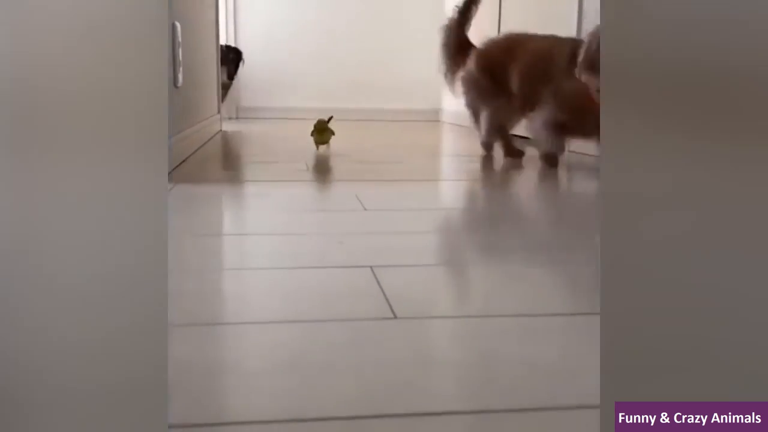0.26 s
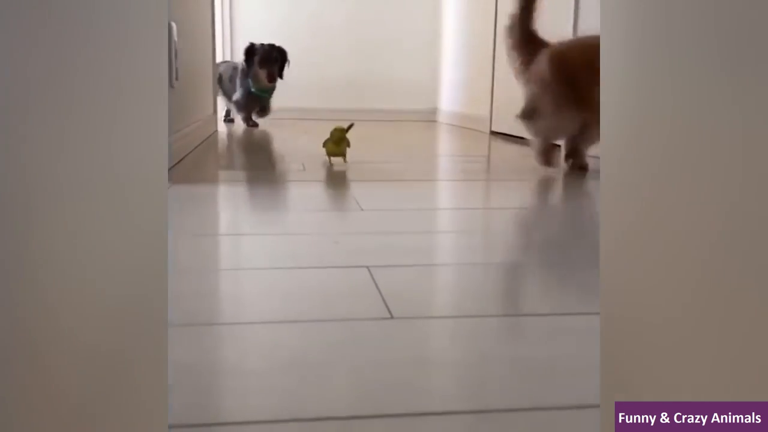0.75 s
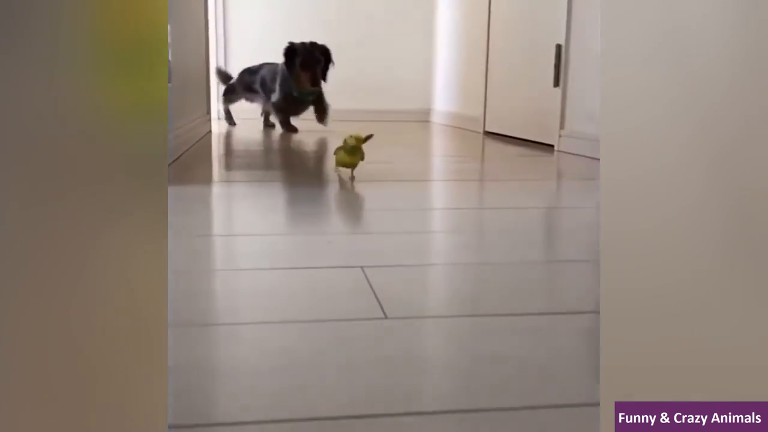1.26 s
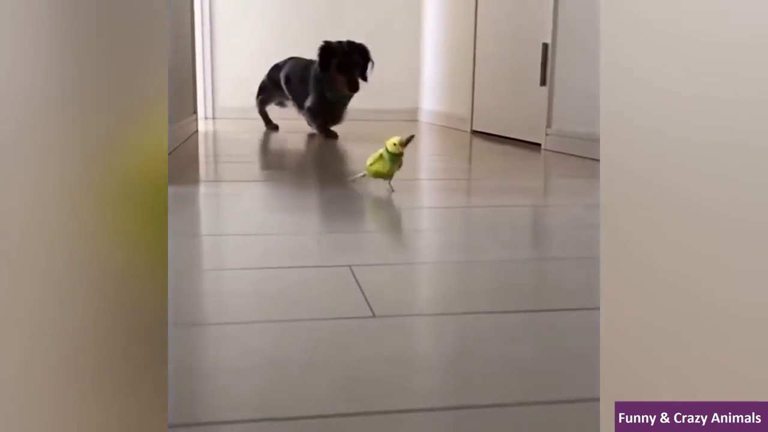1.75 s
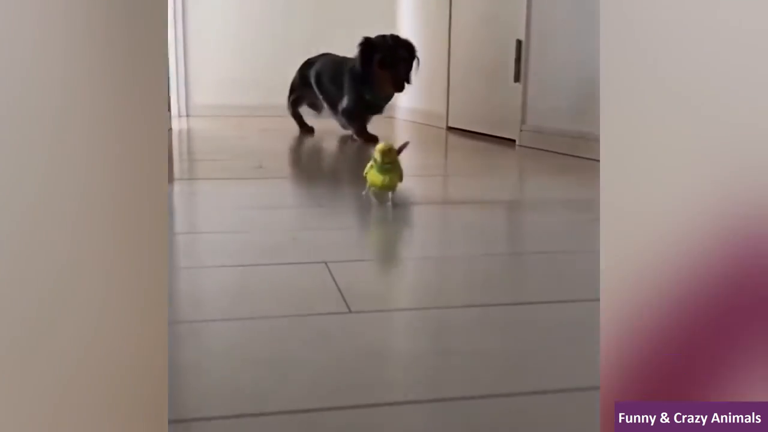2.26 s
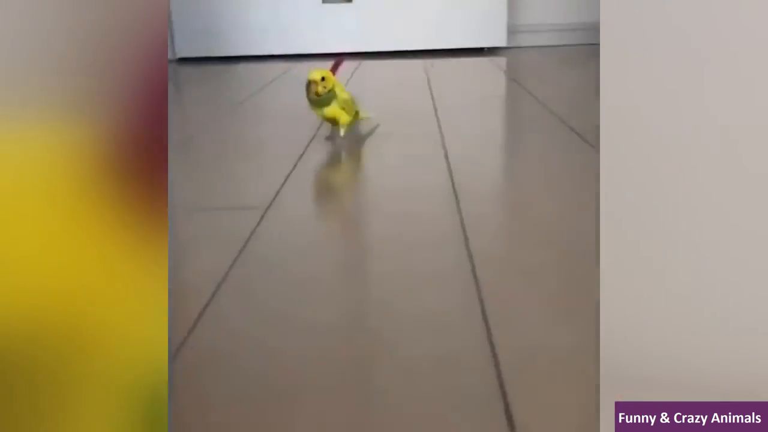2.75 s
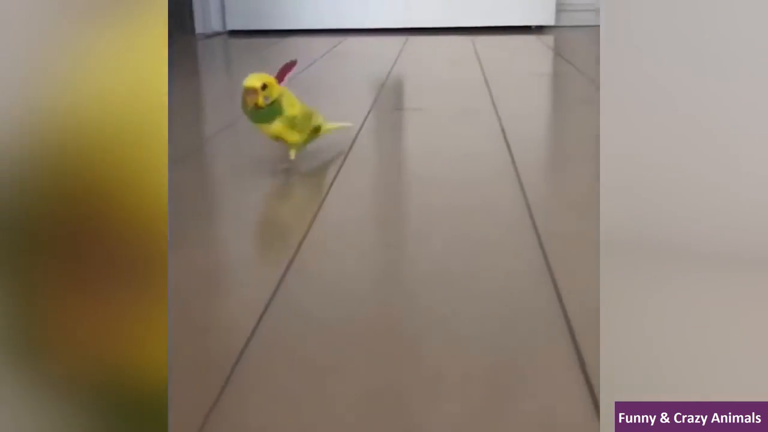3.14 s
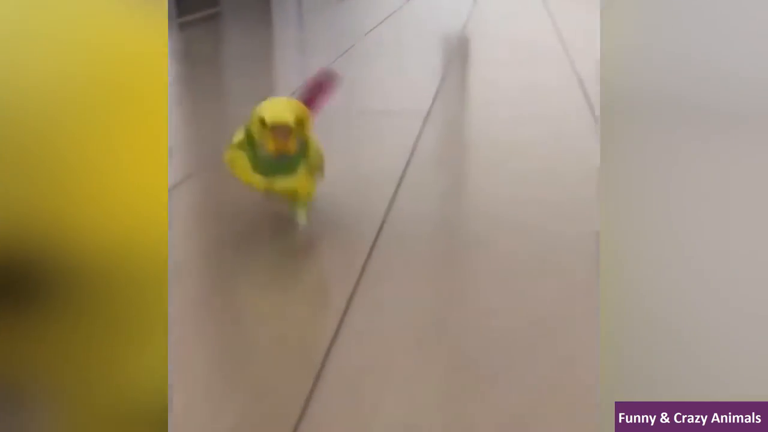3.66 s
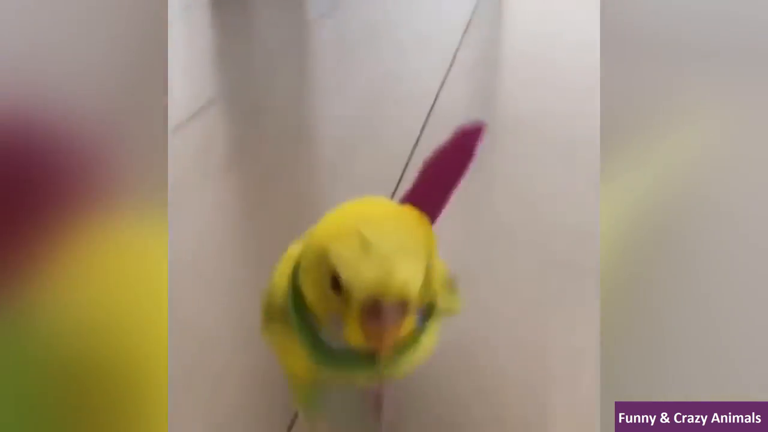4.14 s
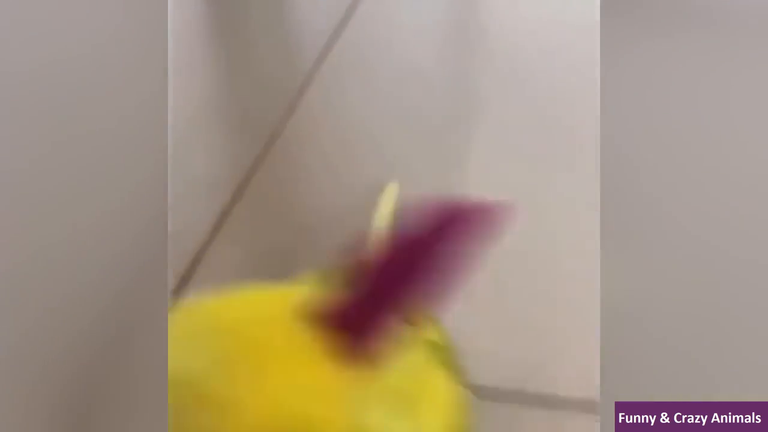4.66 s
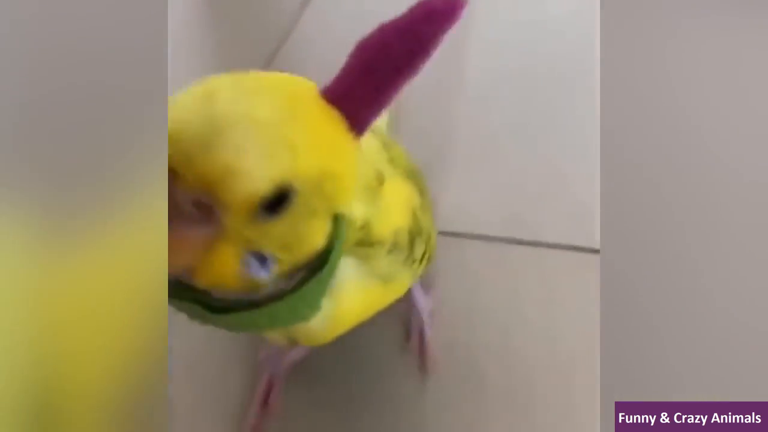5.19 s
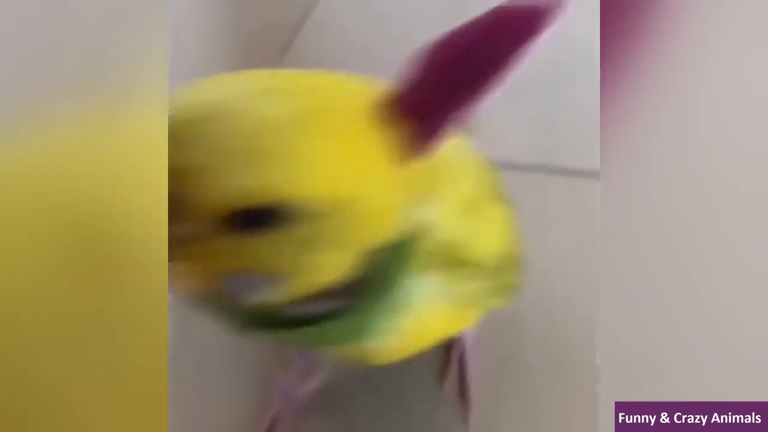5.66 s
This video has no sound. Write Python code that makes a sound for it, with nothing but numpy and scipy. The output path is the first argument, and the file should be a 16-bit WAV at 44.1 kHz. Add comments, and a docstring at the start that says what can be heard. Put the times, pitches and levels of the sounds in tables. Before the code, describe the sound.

Bright, irregular claw clicks and little scratches ring in a hallway as a small dog trots on hard tiles over a low room rumble. After a momentary drop to silence, the softer, rapid steps of a small parrot take over, coming close to the microphone. A few taps sound hollow, and the steps thin out near the end above a faint hum.

```python
"""A small dog trots over a tiled hallway floor: its claws click and scrape in clusters, and the walls ring.
Each claw excites its own resonance by friction and knocks the floor. After a brief dip to silence
a small parrot patters up close: each toe ticks and sends a short bending wave through the floor,
and a few taps set a hollow tile ringing. Under both lies low room noise, later with a faint hum."""
import sys
import numpy as np
from scipy import signal
from scipy.fft import rfft, irfft, next_fast_len
from scipy.io import wavfile
from scipy.ndimage import uniform_filter1d

SR = 44100
rng = np.random.default_rng(int(sys.argv[2]) if len(sys.argv) > 2 else 0)


def dump_mix(stems):
    """Bounce the given channels to the path in sys.argv[1] as a 16-bit WAV at rate SR."""
    frames = np.atleast_2d(stems).T  # one column per channel
    limited = np.clip(frames, -1, 1)  # hard clip at full scale
    pcm = np.round(limited * 32767).astype(np.int16)
    wavfile.write(sys.argv[1], SR, pcm)


N = 261080
CHANGE_S = 3.0  # the parrot takes over from the dog

# Spectra of rumble, air, nail tick, floor thud and claw (frequency [Hz], relative level [dB])
RUMBLE_SPECTRUM = [(15, -46), (25, -17), (48, -1.5), (68, -1), (105, 4), (160, -21), (203, 1), (235, -17.5),
                   (290, 0), (400, -8), (700, -14), (1500, -30.5)]
AIR_SPECTRUM = [(15, -50), (25, -29), (50, -13), (85, -12), (130, -12), (230, -13), (300, -17), (650, -28),
                (1000, -29), (3000, -40), (4600, -42), (14000, -46)]
TICK_SPECTRUM = [(500, -16), (2000, -5), (3000, -3), (3600, 0), (4800, -4), (5900, 1), (7000, -4),
                 (12000, -2.5), (14000, -4)]
THUD_SPECTRUM = [(120, -43), (250, -5.5), (400, 5.5), (600, -1), (900, -6), (1300, -9.5), (1850, -7.5),
                 (2400, -21.5), (5000, -33)]
CLAW_SPECTRUM = [(200, -19), (600, -12), (1400, -6), (2000, -10.5), (2650, -8), (3250, -1.5), (4200, -8),
                 (5000, -6), (5650, 0), (7000, -6.5), (8200, -2.5), (10200, -10), (11100, -6.5),
                 (12500, -15.5)]
# Spectrum of the hum's wavering (frequency [Hz], relative level [dB])
SWAY_SPECTRUM = [(1, 0), (4, -5), (10, -25), (60, -90)]
# Shelves that tilt a spectrum (frequency [Hz], share of the boost [1])
TICK_SHELF, THUD_SHELF = [(5000, 0), (10000, .7)], [(500, .11), (1800, .89)]
CLAW_SHELF, KNOCK_SHELF = [(6500, 0), (10500, .8)], [(1500, 1), (2700, 0)]
# Reverberation around the dog and the parrot (frequency [Hz], time to fall 60 dB [s])
DOG_T60 = [(300, 0.8), (1000, 0.78), (3000, 0.34), (6000, 0.58), (12000, 0.23)]
PARROT_T60 = [(300, 0.15), (1500, 0.3), (6000, 1), (12000, 0.12)]
# Gains of the air, the parrot's echo and the whole scene with its dip (time [s], gain [dB])
AIR_GAIN = [(0, 10.5), (2.9, 6.5), (3.1, 3), (4.7, 5), (5.0, 2.7)]
PARROT_ECHO_GAIN = [(3.1, 3.5), (4.2, -4.5), (5.8, -7)]
SCENE_GAIN = [(2.92, -6.5), (2.975, -15.5), (2.995, -34), (3.008, -47), (3.02, -11), (3.06, -5.5)]
# Taps on a hollow tile (time [s], relative level [dB], pitch [Hz])
HOLLOW_TAPS = [(3.163, -42, 1410), (3.246, -48, 1450), (3.714, -48.5, 1690), (3.890, -51.5, 1790),
               (4.619, -43, 1200)]
# Parrot steps (time [s], relative tick level [dB], relative thud level [dB], thud brightness [dB])
PARROT_STEPS = [(3.046, -46.5, -41.5, -8), (3.162, -50.5, -41.5, -3), (3.245, -53, -39, -2.5),
                (3.36, -47.5, -40.5, -15), (3.4326, -49.5, -48.5, -6), (3.5263, -43, -60, -5),
                (3.5366, -42, -38.5, 2), (3.6043, -42, -40.5, 7), (3.7131, -43, -35, -4.5),
                (3.7896, -43.5, -40, -9), (3.8883, -46, -33, 3.5), (3.9777, -45, -38.5, 1.5),
                (4.065, -37, -31, 2.5), (4.145, -43, -31.5, -0.5), (4.2515, -36.5, -34, -3.5),
                (4.3364, -42, -39, -5), (4.391, -48, -68, -7), (4.456, -41.5, -34, -15),
                (4.5422, -39.5, -36.5, -10), (4.6185, -42, -43, 3), (4.661, -38, -38, -5),
                (4.762, -35.5, -42.5, -1), (4.9175, -43.5, -46.5, -2), (5.1426, -56.5, -53, -1),
                (5.2962, -55, -52.5, -14), (5.374, -58, -47, -8), (5.545, -50.5, -49, -9),
                (5.578, -39.5, -36.5, -0.5)]
# Pads tick dully, nails brightly (tick over thud [dB], tick treble [dB])
TICK_TREBLE = [(-13, -3), (-4, 5)]
# Paw landings (time [s], relative level [dB], ring pitch [Hz], treble [dB], floor knock [dB],
# second claw's delay [ms], its level over the first [dB], its ring pitch [Hz])
PAW_LANDINGS = [(0.001, -41.5, 2760, -2, 2, 8, -4, 5650), (0.052, -34, 7700, 0, -1.5, 7, -0.5, 8700),
                (0.133, -35.5, 3100, -8, -3, 5.6, -10, 5700),
                (0.146, -35.5, 5760, -11, 0.5, 13.4, -2.5, 3230),
                (0.2343, -33, 6040, 0.5, -3, 9, -0.5, 8000), (0.3487, -33, 3430, -1.5, 0.5, 14.5, 3, 5500),
                (0.418, -32.5, 7200, -5, 2, 7, 0.5, 2780), (0.5785, -34, 5740, 0, 3, 6, -8, 3400),
                (0.606, -36.5, 3700, 6, 0, 6, 0, 2950), (0.7662, -28.5, 5350, -5.5, -3, 7, 1.5, 3040),
                (0.9238, -42, 3000, -20, 0.5, 14, -8.5, 5140), (1.0242, -24.5, 5450, 0, 0, 6, 1, 11000),
                (1.207, -35, 5060, -10, -1, 6.6, -9, 5600), (1.2277, -34, 5400, 3, 1, 6, -12, 3300),
                (1.2449, -26, 3300, -0.5, 5, 8, -8, 4480), (1.4835, -24, 5200, -1.5, 0, 9, -4.5, 5600),
                (1.6568, -28.5, 6150, -12, -4, 5, -13, 3400), (1.7091, -28.5, 6200, 5.5, 3.5, 5, -5, 6300),
                (1.7489, -24.5, 5250, 2, -0.5, 2.2, -0.5, 5130),
                (2.0311, -17.5, 3550, -2, -2.5, 10, -5.5, 11200), (2.148, -38.5, 3260, 5.5, 5, 6, -8, 5600),
                (2.2011, -34.5, 3070, 0, -0.5, 12, -4.5, 8500), (2.2833, -40, 4200, -2, 7, 9, 1.5, 7550),
                (2.312, -25.5, 12000, -0.5, 2.5, 6, -3, 3340), (2.4508, -40.5, 6100, -2, 0, 6, -9, 3600),
                (2.593, -24.5, 5800, 2, -0.5, 11, -1, 8200), (2.8797, -33.5, 6360, -1.5, 2, 9, -4.5, 5470)]
# Single claw clicks, each on its own (time [s], relative level [dB], ring pitch [Hz], treble [dB])
CLAW_CLICKS = [(0.5664, -28, 5950, -8), (0.611, -29.5, 2980, -12), (0.8182, -29, 3600, -3),
               (1.0896, -23.5, 6250, 3.5), (1.199, -26, 4980, -10), (1.3872, -31, 7200, -5),
               (1.5494, -30, 3380, 1), (1.8627, -35, 3640, -9), (1.875, -31, 6220, -9),
               (2.007, -34, 9300, -1), (2.1934, -28.5, 6400, -6), (2.4902, -35, 3900, -8),
               (2.558, -40, 7440, -13), (2.732, -41, 5320, -8), (2.7676, -34, 6800, 1),
               (2.83, -39, 3230, -12)]
# Ring pitch of grazing and settling claws (lowest [Hz], highest [Hz])
RING_RANGE = (3200, 6200)


def undb(db):
    """Decibels to amplitude ratio."""
    return 10 ** (np.asarray(db) / 20)


def curve(rows):
    """Gain over time, interpolated in decibels."""
    return undb(np.interp(np.arange(N) / SR, *np.transpose(rows)))


def freqs(size):
    """Fourier bin frequencies, at least 1 Hz."""
    return np.maximum(np.fft.rfftfreq(size, 1 / SR), 1)


def along(points, hz):
    """Interpolation on a log-frequency axis."""
    f, value = np.transpose(points)
    return np.interp(np.log(hz), np.log(f), value)


def pulse(x):
    """Energy normalisation: a click is tapered and given the energy of one millisecond at rms 1."""
    x = x * np.cos(np.linspace(0, np.pi / 2, len(x))) ** 2
    return x / np.sqrt(np.sum(x ** 2) * 1000 / SR)


def add(track, s, x):
    """Superposition: x joins the track at time s."""
    i = max(int(s * SR), 0)
    track[i:i + len(x)] += x[:max(len(track) - i, 0)]


def resonate(x, db):
    """Causal resonance: a minimum-phase filter with this gain per frequency."""
    cepstrum = irfft(np.log(undb(db)))
    cepstrum[1:len(x) // 2] *= 2
    cepstrum[len(x) // 2 + 1:] = 0
    return irfft(rfft(x) * np.exp(rfft(cepstrum)))


def noise(spectrum):
    """Spectral shaping of white noise, at rms 1."""
    size = next_fast_len(N + N % 2, True)
    white = rfft(rng.standard_normal(size))
    x = irfft(white * undb(along(spectrum, freqs(size))), size)[:N]
    return x / np.sqrt(np.mean(x ** 2))


def ripple(hz, db, step_hz=900):
    """Random spectral ripple in dB: no two contacts are alike."""
    steps = np.arange(0, SR / 2 + step_hz, step_hz)
    return db * np.interp(hz, steps, rng.standard_normal(200)[:len(steps)])


def friction(envelope):
    """Broadband excitation: a run of tiny slips, whitened to drive all pitches alike."""
    spectrum = rfft(rng.standard_normal(len(envelope)) * envelope)
    power = uniform_filter1d(np.abs(spectrum) ** 2, size=70)
    return irfft(spectrum / np.sqrt(power + 1e-18))


def background(hum_hz=85.8, waver=0.28, drift_rad=0.17):
    """Noise of room air, over a rumble and later an appliance hum modulated in amplitude and phase."""
    t = np.arange(N) / SR
    amplitude = np.sqrt(2) * (1 + waver * noise(SWAY_SPECTRUM))
    hum = amplitude * np.sin(2 * np.pi * hum_hz * t + drift_rad * noise(SWAY_SPECTRUM))
    rumble = undb(-52.5) * noise(RUMBLE_SPECTRUM)
    air = undb(-60.5) * noise(AIR_SPECTRUM) * curve(AIR_GAIN)
    return air + np.where(t < CHANGE_S, rumble, undb(-58.5) * hum)


def room(t60, build_s, early, early_s, size=18432):
    """Reverberation: wall reflections build up, then each band decays exponentially at its own rate."""
    t, centres = np.arange(size) / SR, np.geomspace(300, 12000, 5)
    bands = np.array([along(np.column_stack([centres, one]), freqs(size)) for one in np.eye(5)])
    decay = undb(-60 * t / along(t60, centres)[:, None])
    onset = 1 - np.exp(-(t / build_s) ** 2)
    envelopes = decay * onset * (1 + early * np.exp(-t / early_s))
    envelopes /= np.sqrt(np.sum(envelopes[-2] ** 2))

    def echo(x):
        """Convolution with a fresh impulse response: every spot has its own echoes."""
        reflections = irfft(bands * rfft(rng.standard_normal(size)))
        return signal.fftconvolve(x, np.sum(reflections * envelopes, axis=0))
    return echo


def hollow_tile(decay_s=0.032, width=0.21, size=8192):
    """Damped free vibration: a cluster of close tile modes rings on after a tap."""
    track, envelope = np.zeros(N), np.exp(-np.arange(size) / SR / decay_s)
    for s, db, hz in HOLLOW_TAPS:
        band_db = -20 * np.log10(1 + (np.log(freqs(size) / hz) / width) ** 2)
        add(track, s, undb(db) * pulse(resonate(friction(envelope), band_db)))
    return track


def nail_tick(treble_db, length_ms, size=2048):
    """Impact and friction: a tiny nail snaps onto the tile and drags a little."""
    ms, hz = np.arange(size) / SR * 1000, freqs(size)
    age = ms / length_ms
    snap = age ** 2 * np.exp(-1.5 * age)
    drag = .05 * np.exp(-ms / 5)
    colour = along(TICK_SPECTRUM, hz) + treble_db * along(TICK_SHELF, hz) + ripple(hz, 3)
    return pulse(resonate(friction(snap + drag), colour))


def shuffles(count=24):
    """Sliding friction: the parrot shifts its weight and its toes brush softly over the tile."""
    track = np.zeros(N)
    for when, force, length in rng.random((count, 3)):
        scuff = nail_tick(treble_db=-3, length_ms=3 + 6 * length)
        add(track, CHANGE_S + when * (N / SR - CHANGE_S), undb(-62 + 8 * force) * scuff)
    return track


def floor_thud(bright_db, travel_ms=4.5, size=2048):
    """Dispersion: bending waves speed up with the root of frequency, so a tap becomes a falling chirp."""
    hz = freqs(size)
    khz = hz / 1000
    # delay is travel_ms / sqrt(kHz), counted from the arrival of 10 kHz, so 1 kHz lags about two thirds of
    # travel_ms
    phase = 2 * np.pi * travel_ms * (2 * np.sqrt(khz) - khz / np.sqrt(10))
    colour = along(THUD_SPECTRUM, hz) + bright_db * along(THUD_SHELF, hz) + ripple(hz, 3, step_hz=296)
    return pulse(irfft(undb(colour) * np.exp(-1j * phase)))


def parrot(lead_s=0.0045, lag_s=0.0026):
    """Three toe impacts a step; the direct-to-reverberant ratio rises as the bird comes close."""
    track, echo = np.zeros(N), room(PARROT_T60, build_s=0.0054, early=2.3, early_s=0.027)
    for s, nail_db, floor_db, bright_db in PARROT_STEPS:
        early, late = rng.uniform(.7, 1.3, size=2)
        wall_db = np.interp(s, *np.transpose(PARROT_ECHO_GAIN))
        treble_db = np.interp(nail_db - floor_db, *np.transpose(TICK_TREBLE))
        for offset_s, toe_db in [(-lead_s * early, -14), (lag_s * late, -12), (0, 0)]:
            nail = undb(nail_db + toe_db) * nail_tick(treble_db, length_ms=0.79)
            floor = undb(floor_db + toe_db) * floor_thud(bright_db)
            add(track, s + offset_s, nail + floor)
        # only the main toe is strong enough to excite the room
        add(track, s, undb(wall_db) * echo(nail + undb(-3) * floor))
    return track


def claw(ring_hz, treble_db, knock_db, scrape_ms, ring_db, ripple_db, width=0.065, size=2048):
    """Friction-driven resonance: a claw skids on the tile, rings at its own pitch and knocks the floor."""
    ms, hz = np.arange(size) / SR * 1000, freqs(size)
    age = ms / scrape_ms
    peak = ring_db / (1 + (np.log(hz / ring_hz) / width) ** 2)
    tilt = treble_db * along(CLAW_SHELF, hz) + knock_db * along(KNOCK_SHELF, hz)
    colour = along(CLAW_SPECTRUM, hz) + peak + tilt + ripple(hz, ripple_db)
    return pulse(resonate(friction(age * np.exp(-1.6 * age)), colour))


def claw_contacts(strike_ms=1.72, skid_ms=2.25, click_ms=1.32, usual_paw_db=-30.5):
    """Rolling contact: one claw grazes, two strike, the last settles; single claws also click on their own."""
    for paw, chance in zip(PAW_LANDINGS, rng.random((len(PAW_LANDINGS), 4))):
        s, db, ring_hz, treble_db, knock_db, roll_ms, second_db, second_hz = paw
        # a faint paw is far off or screened by the body, so more of it comes from the walls
        wall_db = 4 - 0.44 * (db - usual_paw_db)
        second_s = s + roll_ms / 1000
        early, late = .5 + chance[:2]
        graze_hz, settle_hz = np.interp(chance[2:], [0, 1], RING_RANGE)
        graze = (s - 0.008 * early, -16.5, graze_hz)
        second = (second_s, second_db, second_hz)
        settle = (second_s + 0.022 * late, -14.5, settle_hz)
        yield s, db, wall_db, (ring_hz, treble_db, knock_db, strike_ms)
        for when, share_db, own_hz in (graze, second, settle):  # skidding claws are brighter
            yield when, db + share_db, wall_db, (own_hz, treble_db + 3.5, knock_db, skid_ms)
    wall_db, knock_db = -2.5, -2
    for s, db, ring_hz, treble_db in CLAW_CLICKS:
        yield s, db, wall_db, (ring_hz, treble_db, knock_db, click_ms)


def dog(direct_gain_db=0.85, echo_gain_db=0.56, scratches=40):
    """Direct and diffuse sound: claw strikes and their hallway echoes, among faint scratches."""
    track, echo = np.zeros(N), room(DOG_T60, build_s=0.0033, early=1.0, early_s=0.0077)
    for s, db, wall_db, timbre in claw_contacts():
        direct = claw(*timbre, ring_db=11, ripple_db=3)
        # the walls receive sound from all sides of the claw, so its spectrum is more even
        diffuse = claw(*timbre, ring_db=4, ripple_db=1.5)
        add(track, s, undb(db + direct_gain_db) * direct)
        add(track, s, undb(db + wall_db + echo_gain_db) * echo(diffuse))
    for when, pitch, length in rng.random((scratches, 3)):
        scratch = claw(3000 + 4000 * pitch, 0, 0, scrape_ms=1 + 2 * length, ring_db=9, ripple_db=3)
        add(track, when * CHANGE_S, undb(-48 + 3 * rng.standard_normal()) * scratch)
    return track


def scene():
    """Superposition on the background: first the dog, then the parrot, with a brief dip between."""
    animals = np.where(np.arange(N) / SR < CHANGE_S, dog(), parrot() + shuffles() + hollow_tile())
    return ((animals + background()) * curve(SCENE_GAIN))[None]


def record(dry):
    """Band limiting: an elliptic low-pass cuts steeply above 13850 Hz."""
    return signal.sosfilt(signal.ellip(8, .2, 60, 13850, fs=SR, output="sos"), dry)


dry = scene()
out = record(dry)
dump_mix(out)
```